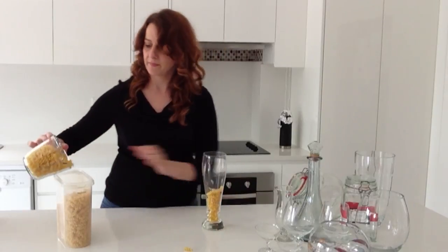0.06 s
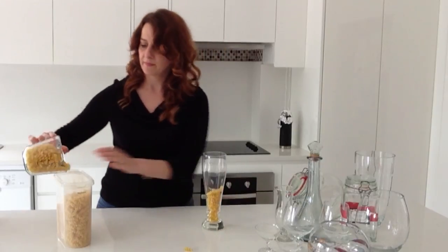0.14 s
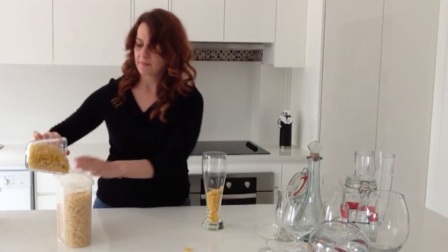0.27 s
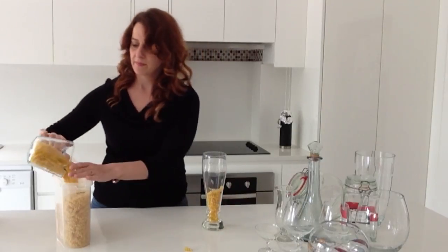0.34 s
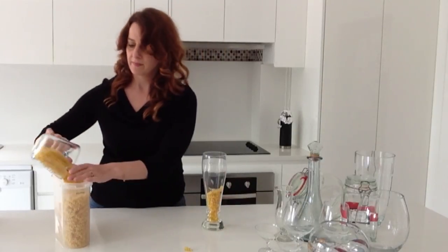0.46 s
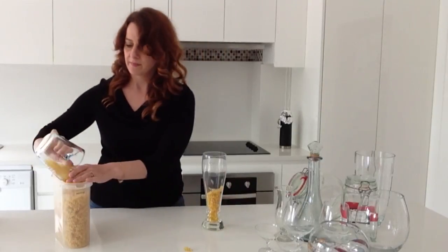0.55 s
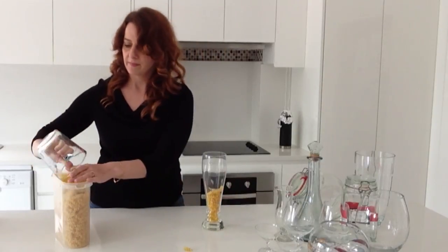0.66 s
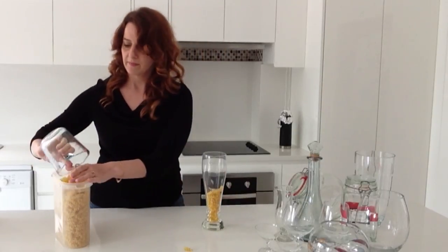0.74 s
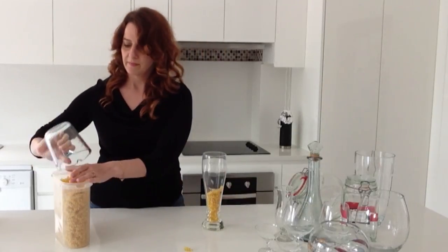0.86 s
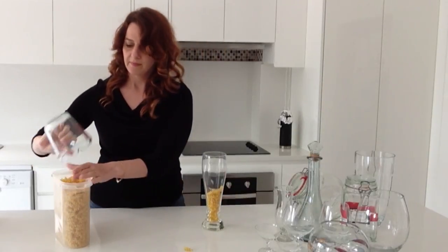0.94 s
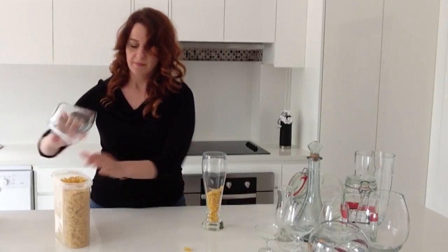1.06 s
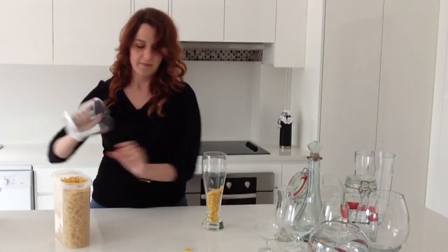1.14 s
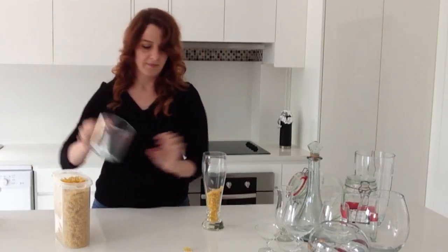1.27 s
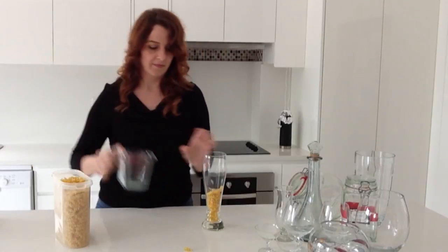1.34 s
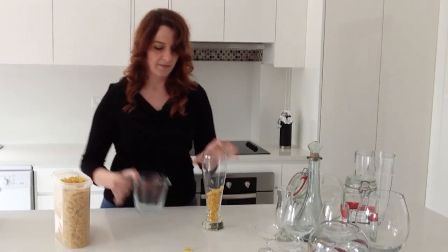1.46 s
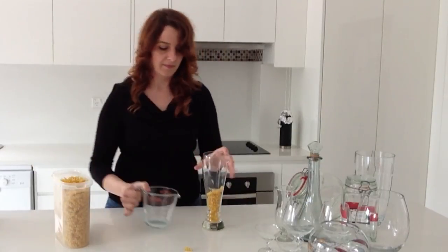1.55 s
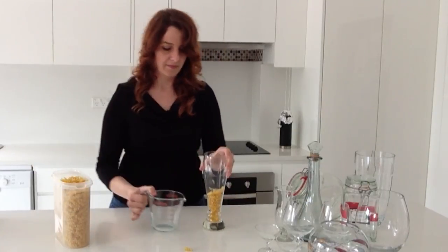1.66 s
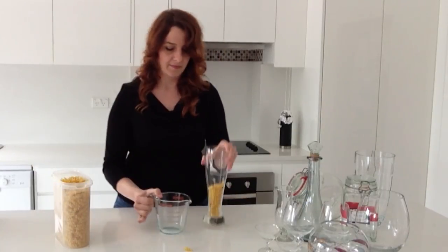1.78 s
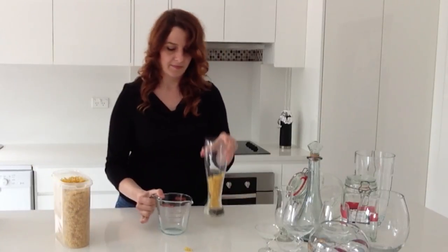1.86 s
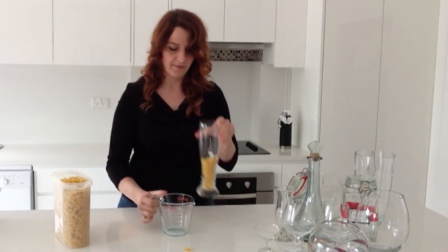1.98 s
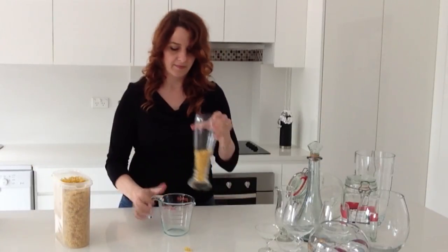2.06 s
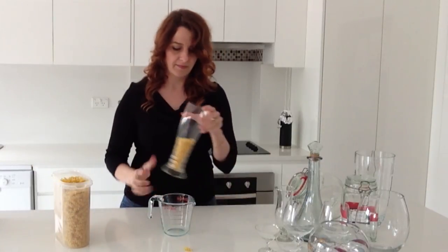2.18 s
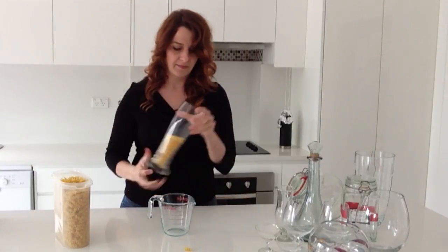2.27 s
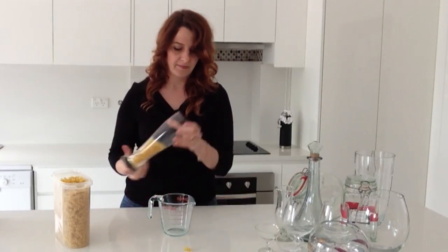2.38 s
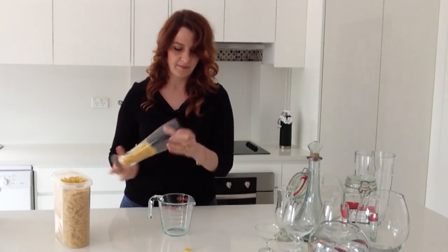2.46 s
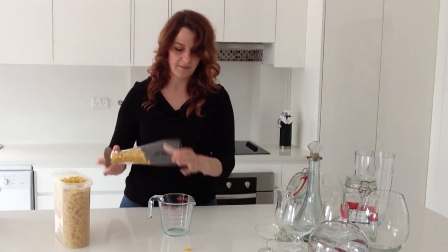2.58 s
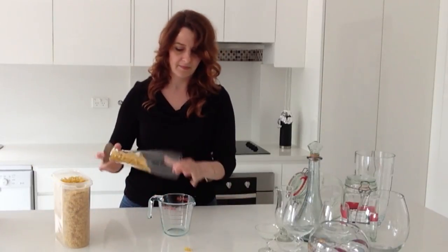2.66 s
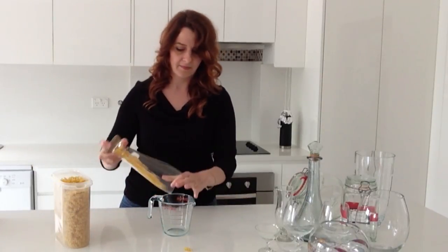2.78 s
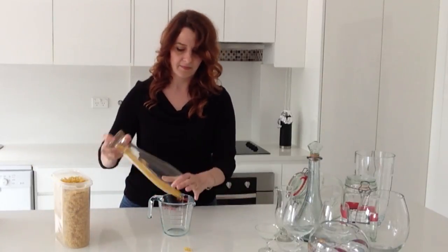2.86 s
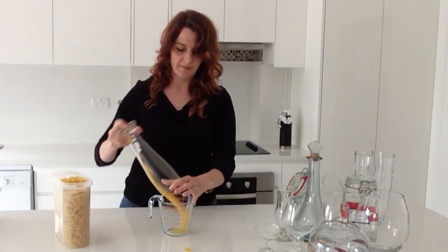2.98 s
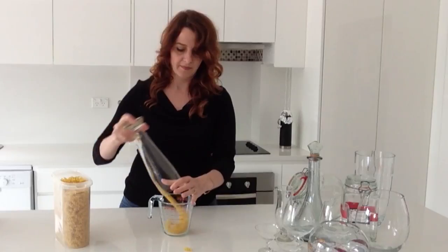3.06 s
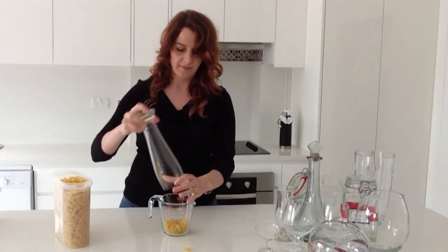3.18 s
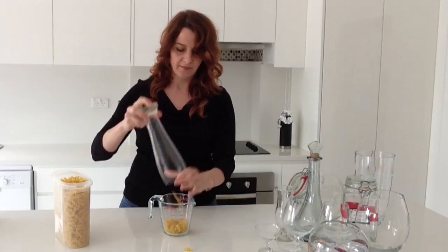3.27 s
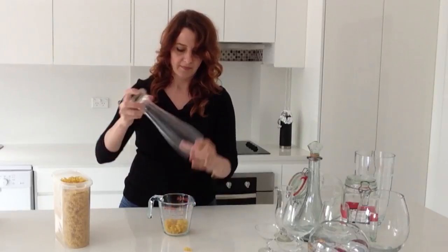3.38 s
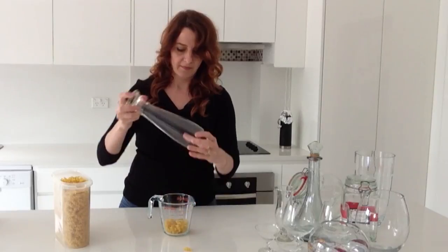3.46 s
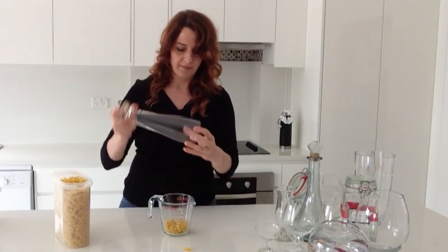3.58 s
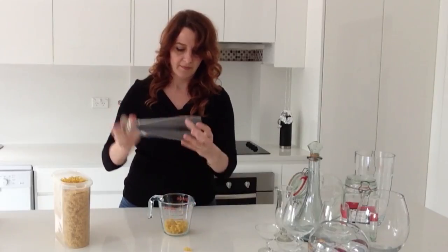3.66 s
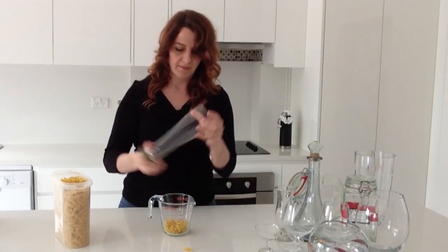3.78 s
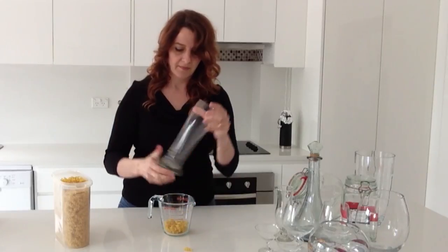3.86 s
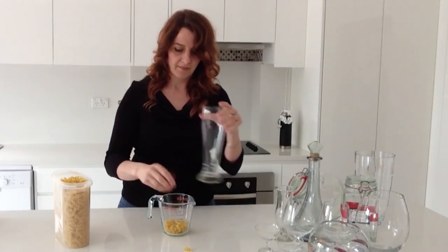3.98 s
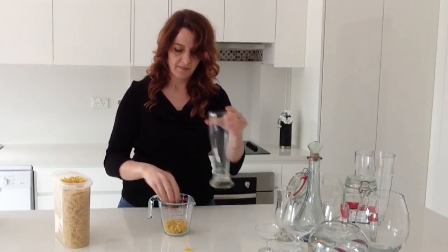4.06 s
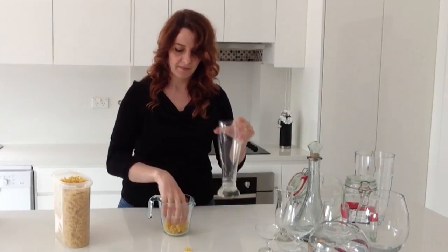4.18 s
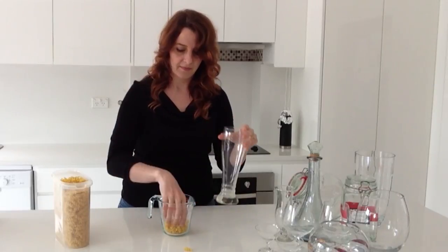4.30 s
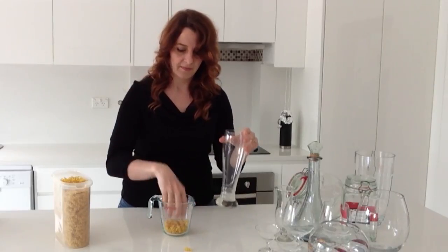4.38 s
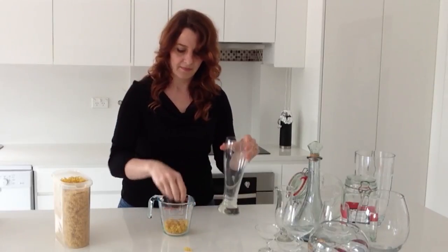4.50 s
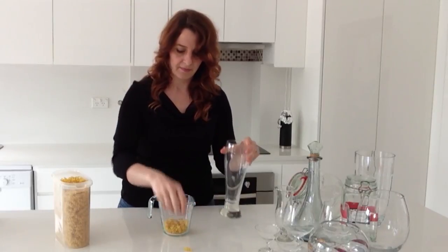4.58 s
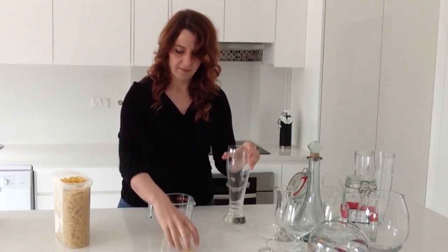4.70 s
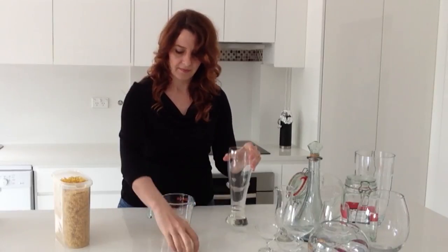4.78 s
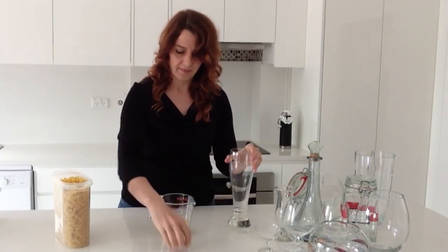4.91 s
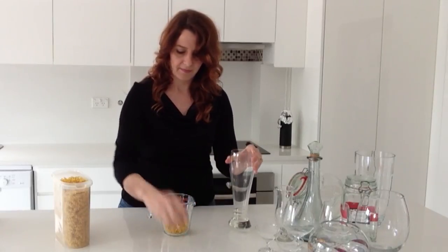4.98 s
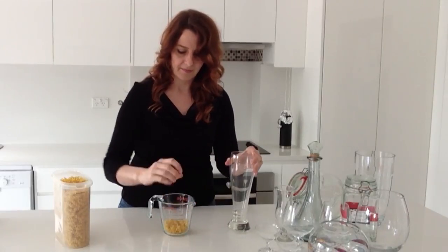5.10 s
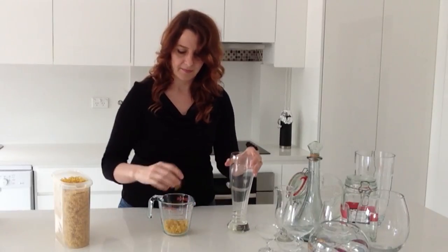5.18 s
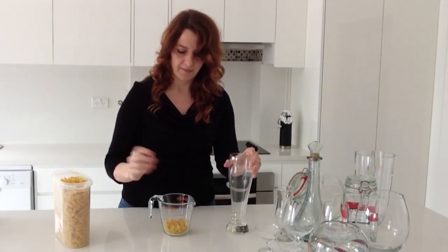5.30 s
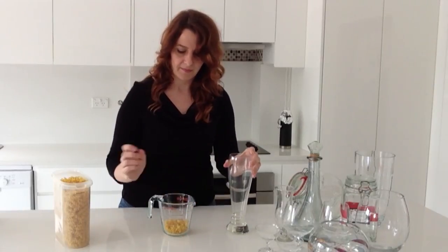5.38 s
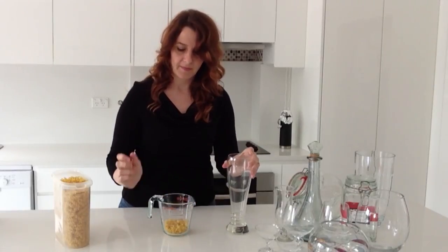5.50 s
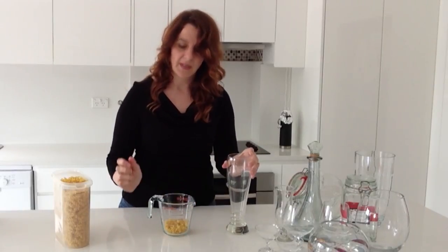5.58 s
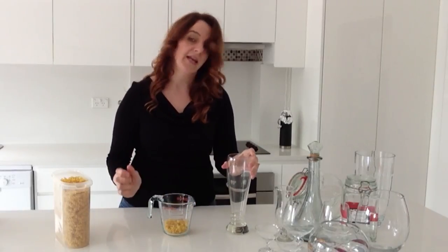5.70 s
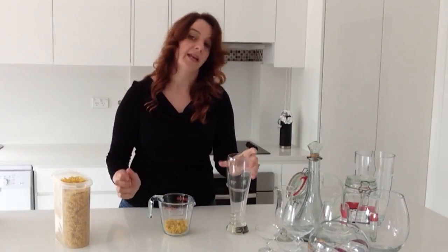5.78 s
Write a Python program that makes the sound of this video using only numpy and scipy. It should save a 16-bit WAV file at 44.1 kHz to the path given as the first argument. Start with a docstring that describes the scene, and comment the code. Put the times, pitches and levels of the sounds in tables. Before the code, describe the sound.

One microphone in an echoing kitchen: a short dense pasta pour into plastic, a light touch and two very loud, slightly overloaded glass knocks, a pause, then pasta sliding along glass and pouring with a ringing rattle into a jug. A few last pieces tick, fingers barely rustle the pasta, and a glass foot lands on the counter. Low room noise throughout.

```python
"""In a hard-walled kitchen, dry pasta is tipped from a glass jug into a plastic canister.
The empty jug is set down hard on the counter and rocks; more pasta slides out of a tall glass vase into it.
Fingers stir the pieces and the vase is put down. Pours are dense random impacts and knocks are single ones,
each a coloured burst plus ringing modes. One microphone hears them in the room and overloads on the loudest."""
import sys
import numpy as np
from scipy import signal
from scipy.fft import rfft, irfft
from scipy.io import wavfile

SR = 44100
rng = np.random.default_rng(int(sys.argv[2]) if len(sys.argv) > 2 else 0)


def master(y):
    """Save y as 16-bit WAV."""
    cut = np.clip(np.atleast_2d(y).T, -1, 1)
    pcm = np.round(cut * 32767)  # scale
    wavfile.write(sys.argv[1], SR, pcm.astype(np.int16))


N = 257984

# modes of the plastic canister: pitch_hz, energy_db (before ring_db), t60_s
CANISTER_MODES = [(354.2, -4, 0.19), (470, -9.5, 0.0074)]


def amp(db):
    """Decibels are a logarithmic measure of amplitude; this gives the gain."""
    return 10 ** (np.asarray(db) / 20)


def unit(x):
    """Energy is the sum of squares; this scales it to one."""
    return x / np.sqrt(np.sum(x ** 2) + 1e-20)


def with_10_ms_energy(db):
    """Energy is power times time: the gain that gives a unit-energy sound the energy of 10 ms at a level."""
    return amp(db) * np.sqrt(SR / 100)


def read(points, hz):
    """Interpolates along a log-frequency axis, as pitch is heard in ratios."""
    f, value = np.transpose(points)
    return np.interp(np.log(hz + 1), np.log(f + 1), value)


def add(mix, start_s, sound):
    """Superposition: sounds sum, each from its own start."""
    part = mix[max(round(start_s * SR), 0):][:len(sound)]
    part += sound[:len(part)]


def click(spectrum, size=12000):
    """Minimum phase: the most front-loaded causal pulse that has this spectrum."""
    hz = abs(np.fft.fftfreq(size, 1 / SR))
    log_gain = np.log(amp(read(spectrum, hz)))
    # the phase follows from the log gain through the Hilbert transform
    log_response = np.conj(signal.hilbert(log_gain))
    return unit(np.fft.ifft(np.exp(log_response)).real)


def ring(modes, size=12000):
    """Modal synthesis: decaying sines that build up within a cycle, each with its own energy."""
    t = np.arange(size) / SR
    out = np.zeros(size)
    for hz, db, t60 in modes:
        build_up = 1 - np.exp(-hz * t)
        decay = np.exp(-np.log(1000) * t / t60)
        out += amp(db) * unit(np.sin(2 * np.pi * hz * t) * build_up * decay)
    return out


def crack(decay_s, size=4096):
    """High modal density: dense, quickly damped vibration acts as decaying noise."""
    envelope = np.exp(-np.arange(size) / SR / decay_s)
    return unit(rng.standard_normal(size) * envelope)


def impact(body, modes, ring_db, decay_s, spot_db=-2.5, detune=0.0047):
    """Modal excitation: the spot struck sets each mode's strength and the shifting load detunes it."""
    burst = unit(signal.fftconvolve(body, crack(decay_s))[:len(body)])
    chance = rng.standard_normal((len(modes), 2))
    struck = []
    for (hz, db, t60), (shift, spot) in zip(modes, chance):
        struck.append((hz * (1 + detune * shift), db + ring_db + spot_db * spot, t60))
    return unit(burst + ring(struck))


def strikes(rows, spectrum, modes, ring_db, decay_s):
    """Contact filtering: a softer contact loses its treble, here above dull_hz."""
    out, body = np.zeros(N), click(spectrum)
    for start_s, db, dull_hz in rows:
        contact = signal.butter(1, min(dull_hz, .45 * SR), fs=SR)
        blow = impact(body, modes, ring_db, decay_s)
        add(out, start_s, with_10_ms_energy(db) * signal.lfilter(*contact, blow))
    return out


def contacts(ticks):
    """Contact stiffening: the harder a piece lands, the shorter and brighter the contact."""
    reference_db, reference_hz, hardening = -20, 10500, 0.3
    return [(start_s, db, reference_hz * amp(db - reference_db) ** hardening) for start_s, db in ticks]


def flow(surges):
    """Granular flow: each surge breaks loose, swells, holds and runs out; their powers add."""
    # each surge starts onset_db from its peak and runs out as this power of the time left
    onset_db, taper = -7.5, 2.4
    t = np.arange(N) / SR
    level = np.zeros(N)
    for start_s, swell_s, hold_s, run_out_s, peak_db in surges:
        age = t - start_s
        swell = amp(onset_db * np.clip(1 - age / swell_s, 0, 1))
        left = np.clip(1 - (age - swell_s - hold_s) / run_out_s, 0, 1)
        level = np.hypot(level, (age >= 0) * amp(peak_db) * swell * left ** taper)
    moving = np.flatnonzero(level)
    span = slice(moving[0], moving[-1])
    return t[span], level[span]


def pour(surges, clatter, modes, ring_db, per_s, spread_db, brighten, count=20):
    """Shot noise: random collisions of `count` shapes come more often, harder and brighter in a stronger flow."""
    t, level = flow(surges)
    speed = level / level.max()
    chance = np.clip(per_s / SR * np.sqrt(speed), 1e-6, 1)  # of a collision in each sample
    draw, strength, piece = rng.random((3, N))[:, :len(t)]
    sign = rng.choice([-1, 1], N)[:len(t)]
    size = amp(spread_db * np.minimum(-np.log(1 - strength), 4))
    # dividing by the expected strength makes the mean power follow the flow
    hits = (draw < chance) * sign * size * level / np.sqrt(chance * np.mean(size ** 2))
    body, shape = click(clatter), (piece * count).astype(int)
    out = np.zeros(N)
    for k in range(count):
        train = hits * (shape == k)
        soft = np.convolve(train, signal.windows.hann(7) / 3, "same")
        # slow pieces stay longer in contact and lose treble
        train = soft + (train - soft) * speed ** brighten
        add(out, t[0], signal.fftconvolve(train, impact(body, modes, ring_db, decay_s=0.00055)))
    return out


def air():
    """Stationary coloured noise: low room noise and faint hiss at a steady level."""
    # colour of the background: pitch_hz, density_db (per Hz, relative)
    air_colour = [(18, -60), (30, -26.5), (69, -32), (85, -15), (187, -3.5), (270, -8.5), (299, -5.5),
                  (455, -7.5), (709, -13.5), (1020, -15.5), (1640, -18.5), (1870, -15), (3980, -23.5),
                  (7860, -25.5), (15500, -30.5)]
    level_db = -54.5
    gain = amp(read(air_colour, np.fft.rfftfreq(N, 1 / SR)))
    noise = irfft(rfft(rng.standard_normal(N)) * gain, N)
    return amp(level_db) * unit(noise) * np.sqrt(N)


def kitchen(x, wet_db, build_s):
    """Reverberation: direct sound, a few wall echoes and a dense tail that decays at its own rate by pitch."""
    # decay of the room: pitch_hz, t60_s
    room_t60 = [(150, 0.53), (400, 0.59), (750, 0.5439), (1300, 0.7867), (2800, 0.7878), (7300, 0.6924),
                (15000, 0.5242)]
    # wall echoes: delay_s, gain (of amplitude)
    echoes = [(.0042, 0.096), (.0095, 0.094), (0.022, 0.15), (0.0358, 0.19)]
    hz, t, noise = signal.stft(rng.standard_normal(SR), SR, nperseg=256)
    decay = np.exp(-np.log(1000) * t / read(room_t60, hz)[:, None])
    tail = signal.istft(noise * decay, SR, nperseg=256)[1]
    build_up = 1 - np.exp(-np.arange(len(tail)) / SR / build_s)
    response = amp(wet_db) * unit(tail * build_up)
    response[0] += 1  # direct sound
    for delay_s, gain in echoes:
        add(response, delay_s, np.array([gain]))
    return signal.fftconvolve(x, response)[:N]


def dry_clicks(decay_s):
    """Damped resonance: short clicks through one broad resonance, without ringing modes."""
    # small dry clicks: start_s, level_db (over 10 ms), centre_hz, width_hz
    clicks = [(0.319, -37, 12200, 6150), (4.973, -57.5, 13000, 4000), (5.426, -26, 11700, 9000),
              (5.4322, -29, 13500, 6240), (5.731, -43.5, 5330, 970), (5.767, -45, 7540, 2000)]
    out = np.zeros(N)
    for start_s, db, hz, width_hz in clicks:
        band = signal.iirpeak(min(hz, .45 * SR), hz / width_hz, fs=SR)
        snap = unit(signal.lfilter(*band, crack(decay_s)))
        add(out, start_s, with_10_ms_energy(db) * snap)
    return out


def handling():
    """Struck bodies: the canister is bumped; the jug touches the counter, lands and rocks,
    with dull echoes 22 ms after two of the knocks; the vase is set down."""
    # blows: start_s, level_db (over 10 ms, before the contact filter), dull_hz
    canister_bumps = [(0.144, -20, 7990), (0.395, -30, 1187), (0.52, -22.5, 800), (0.665, -40.5, 800),
                      (0.8, -44, 776)]
    jug_touches = [(1.65, -21.5, 12260), (1.712, -40, 700)]
    vase_knocks = [(5.4445, -14, 12100), (5.706, -36, 2360)]
    # knocks of the jug and two dull room echoes of them (at 1.991 and 2.091 s), same columns
    jug_knocks = [(1.869, -4.5, 14000), (1.9685, -2, 14000), (1.991, -11.5, 1500), (2.066, -15, 1200),
                  (2.091, -13.5, 1200), (2.122, -34, 1200)]
    # colour of each thud: pitch_hz, density_db (per Hz, relative)
    canister_thud = [(60, -18.5), (200, -14.5), (380, 4.5), (650, -9.5), (1200, -19), (2500, -23.5),
                     (5000, -26), (15000, -55.5)]
    touch_thud = [(80, -23.5), (300, -7), (550, 1.5), (1000, -11.5), (2000, -10.5), (3500, -26),
                  (6000, -41), (15000, -26.5)]
    knock_thud = [(50, -18.5), (120, -20.5), (200, -5.5), (280, -7.5), (500, -0.5), (750, 3), (1050, 3),
                  (2400, -0.5), (3400, -6), (4200, -16.5), (7000, -27.5), (15000, -36)]
    vase_thud = [(50, -22), (110, -20), (200, -13), (320, -6), (480, 0.5), (700, 1), (1100, -3.5),
                 (2600, -5), (3400, -4.5), (4100, -14.5), (6000, -21), (15000, -32)]
    # modes excited by each blow: pitch_hz, energy_db (before ring_db), t60_s
    touch_modes = [(537.4, 3.5, 0.04), (750, -11, 0.0522), (1223, -14.5, .04), (7950, -24, .08),
                   (12540, -33.5, .12)]
    knock_modes = [(374.7, -12, 0.13), (713, -12, 0.055), (725.6, -1, 0.039), (771, -5.5, 0.03),
                   (1927, -17, .06), (2481, -5, .04), (9440, -27.5, 0.1), (12320, -28, 0.11)]
    vase_foot_modes = [(482.6, -12, 0.11), (677, -7, 0.013), (2456, -12.5, 0.054), (3307, -11, 0.064)]
    bumps = strikes(canister_bumps, canister_thud, CANISTER_MODES, ring_db=-2.5, decay_s=0.0087)
    touches = strikes(jug_touches, touch_thud, touch_modes, ring_db=3.5, decay_s=0.0079)
    knocks = strikes(jug_knocks, knock_thud, knock_modes, ring_db=-3, decay_s=0.012)
    set_down = strikes(vase_knocks, vase_thud, vase_foot_modes, ring_db=2.5, decay_s=0.016)
    return bumps + touches + knocks + set_down


def first_pour():
    """Granular impact on two bodies: pasta slides out of the jug and rushes onto the heap in the canister."""
    # surges of pasta by where they rattle: start_s, swell_s, hold_s, run_out_s, peak_db (before mixing)
    leaving_jug = [(0, 0.061, 0.01, 0.34, -31.5), (0.34, 0.1, 0.05, 0.05, -29)]
    into_canister = [(0.39, 0.035, 0.17, 0.053, -25.5), (0.513, 0.027, 0.13, 0.38, -11.5)]
    # single pieces striking the full jug: start_s, level_db (over 10 ms, before the contact filter)
    full_jug_ticks = [(0.021, -24.5), (0.068, -17.5), (0.134, -20.5), (0.275, -25.5)]
    # colour of the clatter in each vessel: pitch_hz, density_db (per Hz, relative)
    full_jug_clatter = [(150, -41), (600, -18.5), (2700, -16.5), (3400, -12.5), (4700, -16.5),
                        (5700, -12.5), (6400, -14), (8000, -7.5), (9000, -15), (11000, -16), (14000, -6)]
    canister_clatter = [(70, -61), (140, -36), (300, -4), (600, -6), (1100, -4.5), (2200, -1), (3800, 2.5),
                        (6500, -2), (9000, -8), (11000, -10.5), (14000, -4.5), (15500, -8.5)]
    # modes of the full jug: pitch_hz, energy_db (before ring_db), t60_s
    full_jug_modes = [(3345, -9, 0.02), (3670, -13, 0.099), (4330, -15, 0.024), (6370, -7.5, 0.11),
                      (7390, -13, 0.046), (8300, -15, 0.11), (9950, -16.5, .05), (10560, -17, 0.061),
                      (13360, -13.5, .05)]
    jug = pour(leaving_jug, full_jug_clatter, full_jug_modes,
               ring_db=-2.5, per_s=4500, spread_db=2.0, brighten=0.058)
    heap = pour(into_canister, canister_clatter, CANISTER_MODES,
                ring_db=-17.5, per_s=3500, spread_db=1.0, brighten=0.28)
    single = strikes(contacts(full_jug_ticks), full_jug_clatter, full_jug_modes, ring_db=-0.5, decay_s=0.0019)
    return amp(1.5) * jug + amp(-3.0) * heap + single


def second_pour():
    """Granular impact on glass: pasta runs down the vase and rattles into the jug; fingers later stir it."""
    # surges of pasta by where they rattle: start_s, swell_s, hold_s, run_out_s, peak_db (before mixing)
    along_vase = [(2.597, 0.005, 0.0043, 0.34, -30), (2.75, 0.034, 0.015, 0.033, -26),
                  (2.815, 0.027, 0.11, 0.24, -15.5)]
    into_jug = [(3.03, 0.12, 0.055, 0.31, -8)]
    stirring = [(4.311, 0.011, 0.05, 0.18, -41)]
    # pieces striking the vase wall: start_s, level_db (over 10 ms, before the contact filter)
    vase_ticks = [(2.576, -32.5), (2.6, -21.5), (2.634, -23), (2.655, -25), (2.818, -18.5), (2.921, -14.5)]
    # pieces landing in the jug: start_s, level_db (over 10 ms, before the contact filter), dull_hz
    jug_ticks = [(3.033, -17.5, 2530), (3.099, -18, 2500), (3.348, -12.5, 12200), (3.41, -15.5, 15500),
                 (3.42, -9, 1820), (3.751, -35, 2450), (4.356, -39.5, 15000)]
    # colour of the clatter in each vessel and of rubbing pieces: pitch_hz, density_db (per Hz, relative)
    vase_clatter = [(100, -66), (600, -20.5), (2300, -23.5), (3050, 9), (4200, -4), (5600, -9), (6700, 7),
                    (8600, -7.5), (10500, -4), (12500, -10), (15000, 1.5)]
    jug_clatter = [(100, -58.5), (350, -28), (750, -14), (1000, -23), (1300, -2.5), (1550, -16),
                   (2600, -13), (3300, -11.5), (4200, -9.5), (6200, -7.5), (7500, 0), (8800, -8.5),
                   (12000, -4.5), (15000, 1)]
    rubbing_clatter = [(100, -45), (400, -23), (800, 3.5), (1000, -12), (1300, 6), (1600, 0.5),
                       (2600, -6.5), (3600, -2), (6000, -4), (7500, 2), (9000, -8), (15000, 6)]
    # modes of the vase and jug: pitch_hz, energy_db (before ring_db), t60_s
    vase_modes = [(3220, -9.5, 0.089), (3873, -1, 0.1), (4880, -7, .08), (7120, -28, .07),
                  (7300, -27.5, 0.041), (8430, -22, 0.049), (9496, -13, .05), (12070, -10, 0.046),
                  (13240, -24, .06)]
    jug_modes = [(1292, -22, .04), (1757, -23, 0.048), (3350, -9.5, 0.084), (3650, -14, 0.16),
                 (3790, -19.5, 0.17), (4805, -19, 0.082), (5260, -16, 0.0804), (7450, -8.5, 0.28),
                 (7300, -25.5, 0.085), (8000, -17.5, 0.11), (8120, -20, .1), (10287, -17.5, 0.098),
                 (11460, -19, 0.13)]
    # mode of the empty jug: pitch_hz, energy_db (against the tick), t60_s
    empty_jug_ping = [(5427, -1.5, .36)]
    slide = pour(along_vase, vase_clatter, vase_modes, ring_db=0, per_s=800, spread_db=3.5, brighten=.15)
    fall = pour(into_jug, jug_clatter, jug_modes, ring_db=-1.5, per_s=1000, spread_db=1, brighten=0.17)
    stir = pour(stirring, rubbing_clatter, jug_modes, ring_db=-11, per_s=3400, spread_db=1.5, brighten=.05)
    on_vase = strikes(contacts(vase_ticks), vase_clatter, vase_modes, ring_db=-5.0, decay_s=0.01)
    in_jug = strikes(jug_ticks, jug_clatter, jug_modes, ring_db=-5.0, decay_s=0.0028)
    # the first two pieces find the glass still undamped
    for start_s, db, _ in jug_ticks[:2]:
        add(in_jug, start_s, with_10_ms_energy(db) * ring(empty_jug_ping))
    return amp(-5.5) * slide + amp(-3.5) * fall + amp(1.5) * stir + on_vase + in_jug


def scene():
    """Superposition at one point: all sources in the kitchen, the same in both channels."""
    vessels = kitchen(handling(), wet_db=0.0, build_s=0.0019)
    pieces = first_pour() + second_pour() + dry_clicks(decay_s=.002)
    pasta = kitchen(pieces, wet_db=-1.5, build_s=0.0027)
    bass_cut = signal.butter(3, 130, "highpass", fs=SR)  # the microphone rolls off the bass
    return np.tile(signal.lfilter(*bass_cut, pasta + vessels) + air(), (2, 1))


def record(dry):
    """Overload: the band-limited input clips at full scale; then the band limit acts again."""
    edge_hz = 15400
    band = signal.firwin(601, edge_hz, window=("kaiser", 8), fs=SR)[None]
    clipped = np.clip(signal.oaconvolve(dry, band, "same"), -1, 1)
    return signal.oaconvolve(clipped, band, "same")


dry = scene()
out = record(dry)
master(out)
```